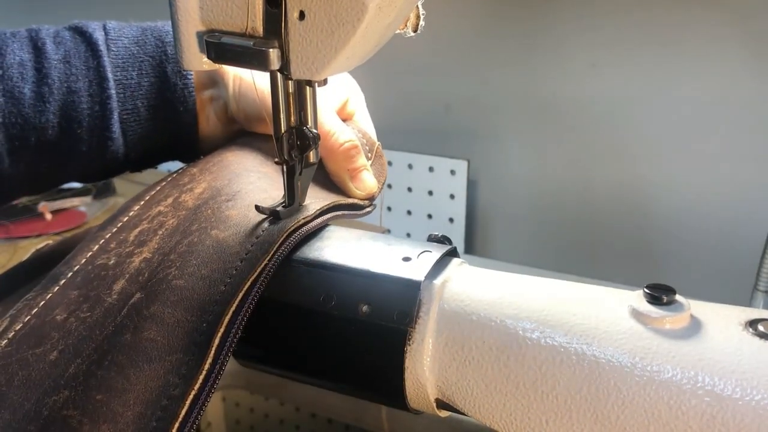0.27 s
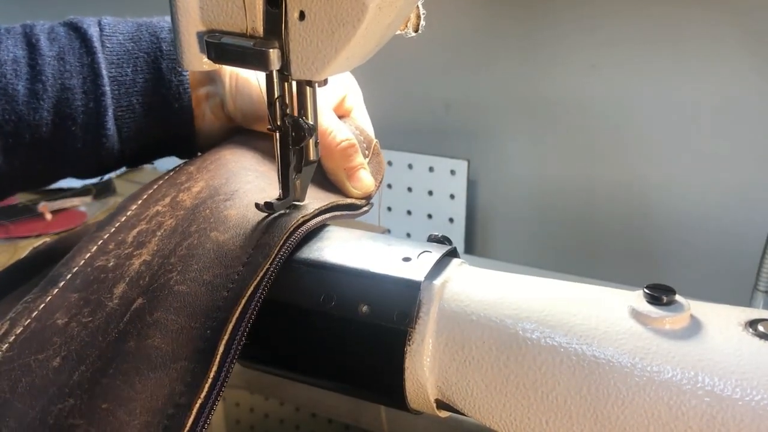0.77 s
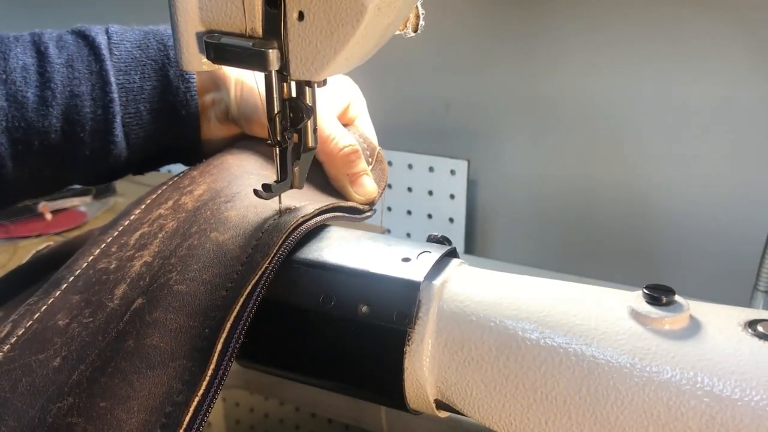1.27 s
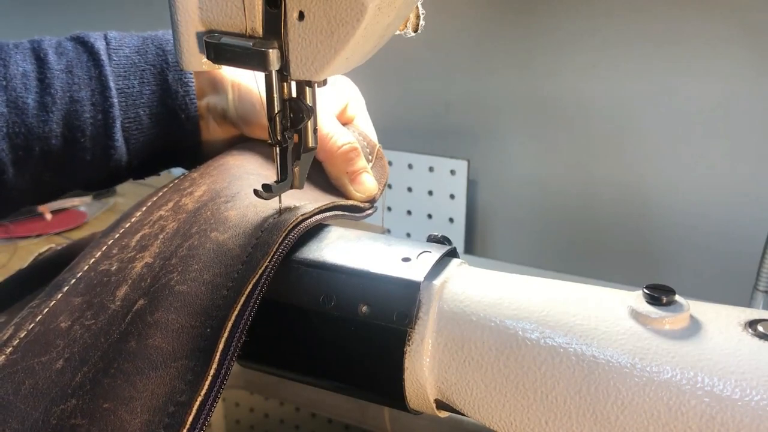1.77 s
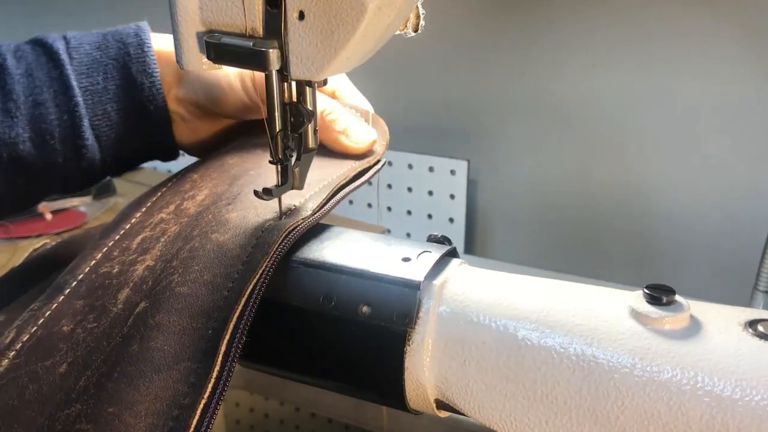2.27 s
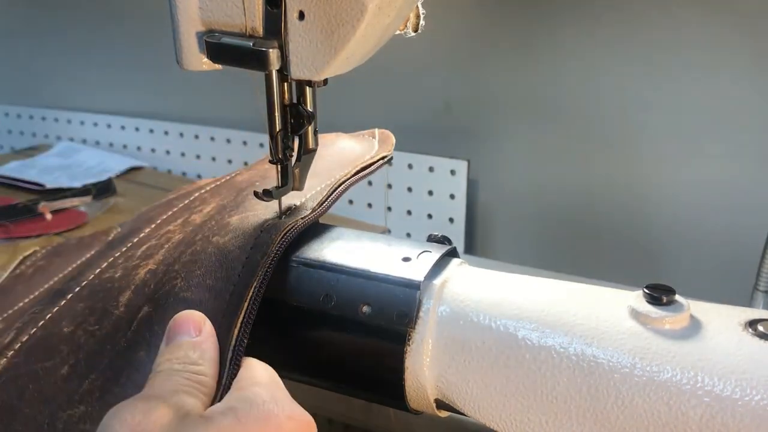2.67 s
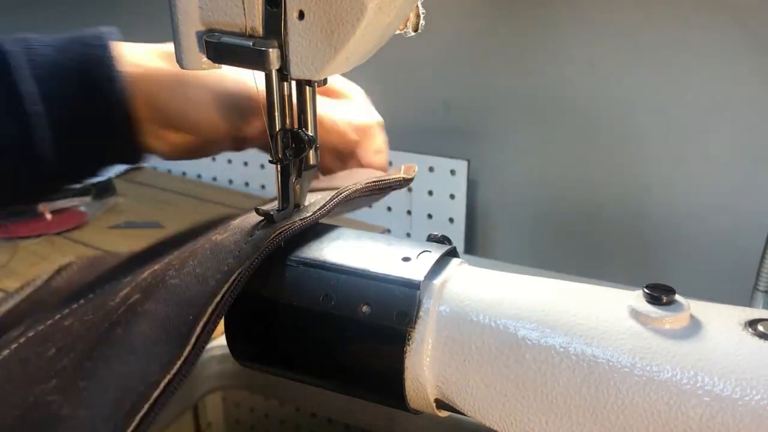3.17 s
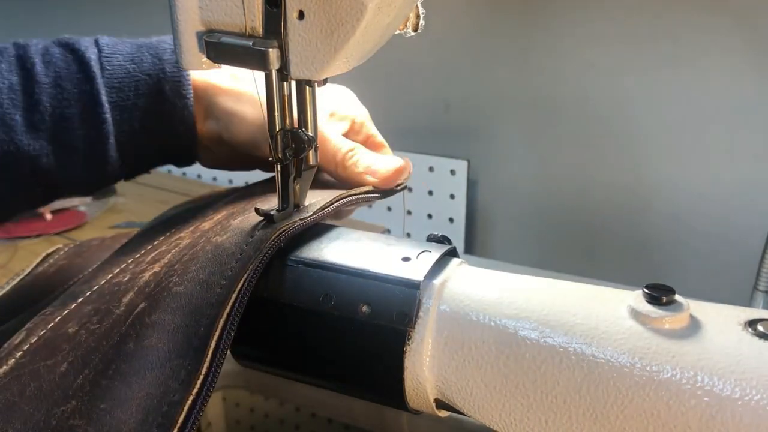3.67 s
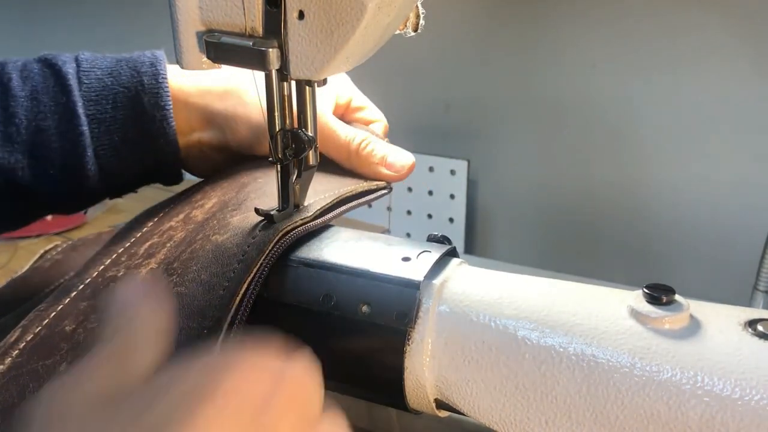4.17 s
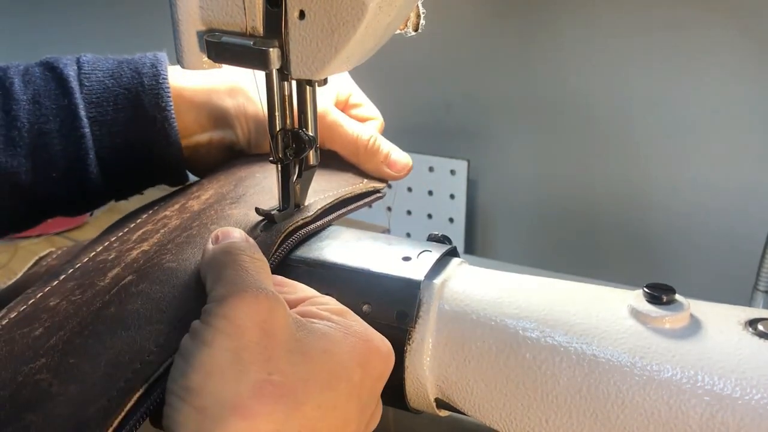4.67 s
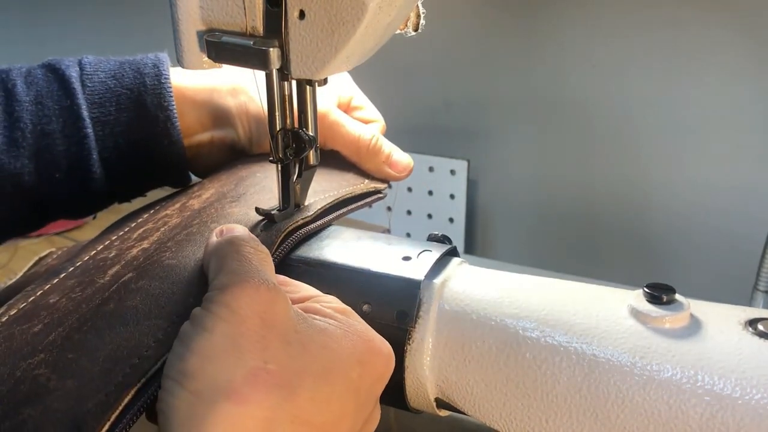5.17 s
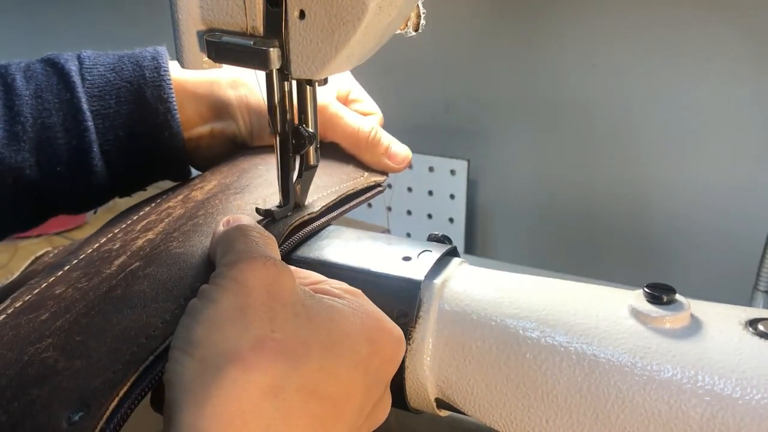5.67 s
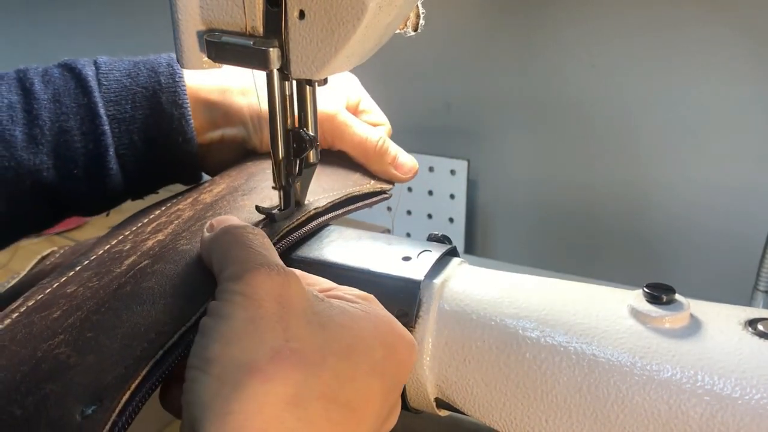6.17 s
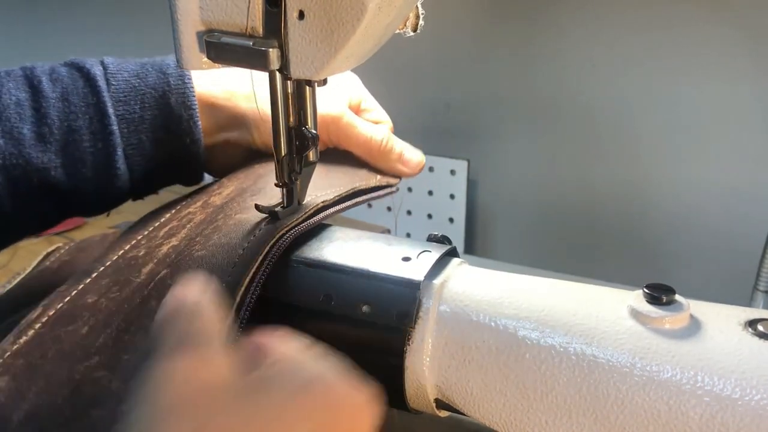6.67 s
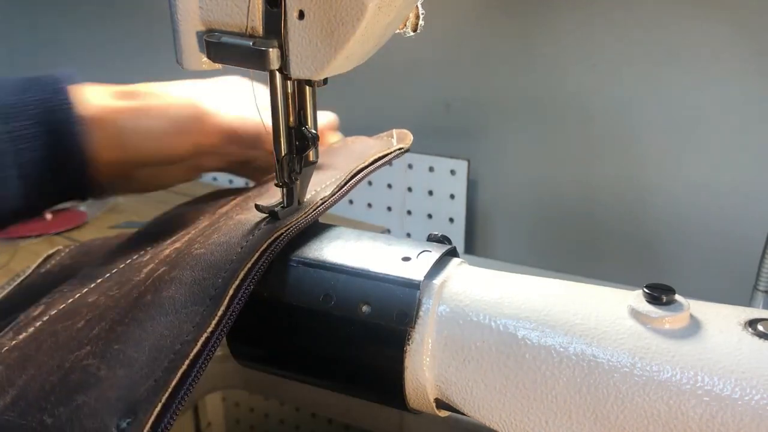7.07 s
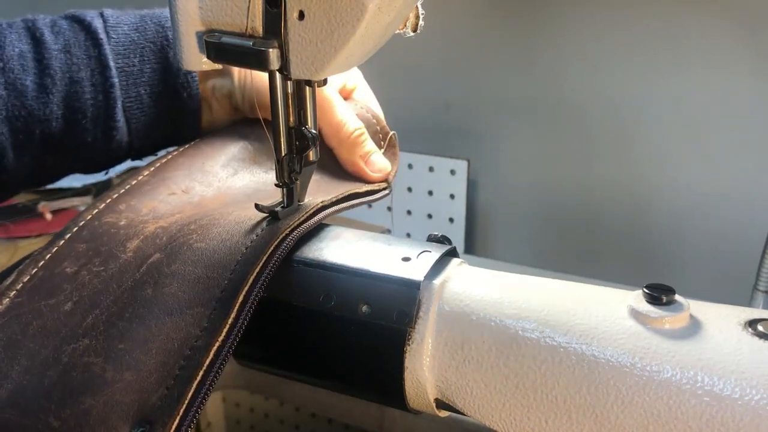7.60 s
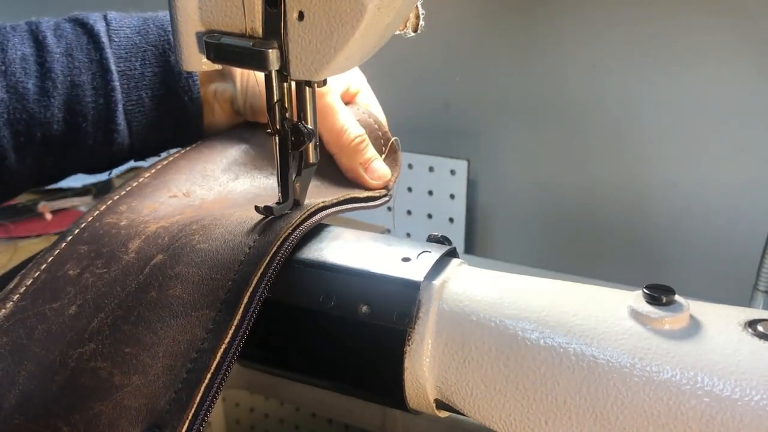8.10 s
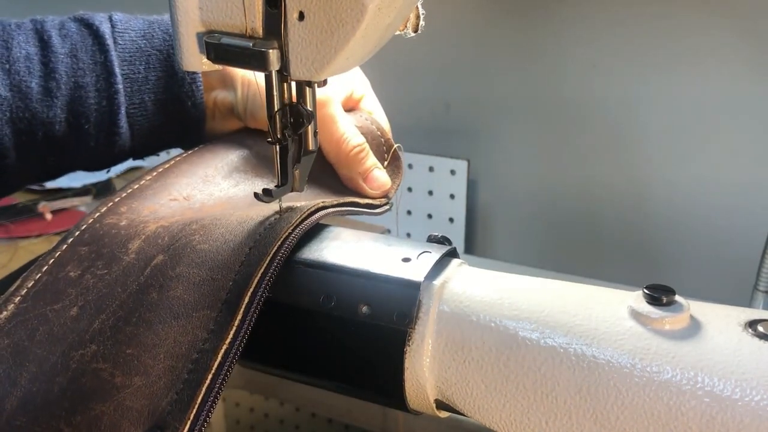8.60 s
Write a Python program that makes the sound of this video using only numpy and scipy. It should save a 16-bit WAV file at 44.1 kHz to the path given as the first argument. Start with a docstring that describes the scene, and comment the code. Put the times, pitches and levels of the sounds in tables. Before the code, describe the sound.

A close microphone in a small workshop catches a heavy sewing machine over its low, slowly wavering motor hum and faint fan rush. From 0 to 0.9 s, a faint ping, crisp metal snaps, leather crackle and a thin, very high squeak. From 1 to 2 s only light ticks, then a firmer click and thump at 2.0. Leather slides and knocks around 2.5-2.8; at 3.0 comes the loudest hard clack with a squeak, rasp and ringing spring. It calms until 4.4, when the linkage slips, squeaks, thumps and twangs. From 5.3 to 6.8 a slow powered run rattles, growls and whines, with four foot blows about 0.4 s apart, ending in clunks. From 7.0 to 7.5 leather scuffs, rasps and a spring ring; from 7.7 to 8.5, clicks, dry rasping and a short falling groan with squeaks at 8.3, then soft rustle, a small click and hum.

```python
"""A cylinder-arm sewing machine is inched through thick leather, close by, over the hum of its idling motor.
Presser foot and feed snap as bursts of force through frame resonances; dry joints rasp, groan and squeak
by stick-slip; a jolted spring rings as decaying sines. One slow run rattles the needle bar and gears.
The leather is turned by hand: filtered noise slides, random ticks creak. A small workshop answers briefly."""
import sys
import numpy as np
from scipy import signal
from scipy.fft import rfft, irfft
from scipy.io import wavfile
from scipy.ndimage import uniform_filter1d

SR = 44100
rng = np.random.default_rng(int(sys.argv[2]) if len(sys.argv) > 2 else 0)


def store_pcm(level_fs):
    """Save levels as 16-bit WAV."""
    pcm = np.round(np.clip(level_fs, -1, 1) * 32767).astype(np.int16)
    wavfile.write(sys.argv[1], SR, np.atleast_2d(pcm).T)


N = 389844
TIME = np.arange(N) / SR
TOP_HZ = 15900  # upper limit of the microphone path


def undb(db):
    """Decibels to gain."""
    return 10 ** (np.asarray(db) / 20)


def unit(x):
    """Scale to an rms of one."""
    return x / np.sqrt(np.mean(x ** 2) + 1e-20)


def gain_curve(rows):
    """Sum, as power, movements that each build up and die away at the same pace."""
    power = 0
    for peak_s, fade_s, db in rows:
        power = power + (undb(db) * np.exp(-np.abs(TIME - peak_s) / fade_s)) ** 2
    return np.sqrt(power)


def walk(rate):
    """Slow random drift with an rms of one, drawn afresh about `rate` times a second."""
    hold = int(SR / rate)
    steps = np.repeat(rng.standard_normal(N // hold + 1), hold)
    return unit(uniform_filter1d(uniform_filter1d(steps, hold), hold)[:N])


def colour(x, points):
    """Shape a sound by a spectrum of (frequency [Hz], level [dB]), interpolated over log frequency."""
    hz, db = np.transpose(points)
    f = np.maximum(np.fft.rfftfreq(len(x), 1 / SR), 1)
    gain = undb(np.interp(np.log(f), np.log(hz), db))
    return irfft(rfft(x) * gain, len(x))


def ring(x, modes):
    """Drive a set of resonances (frequency [Hz], width [Hz], level [dB])."""
    out = 0
    for hz, width, db in modes:
        out = out + undb(db) * signal.lfilter(*signal.iirpeak(hz, hz / width, fs=SR), x)
    return out


def grains(rate, spread_db):
    """Random tiny impacts, `rate` a second, most of them weak and a few strong."""
    hit = rng.random(N) < rate / SR
    size = np.minimum(rng.exponential(size=N), 4)
    return hit * undb(spread_db * size) * rng.choice([-1, 1], N)


def crackle(rate, spread_db, fade_s):
    """Random ticks, each a very short burst of noise."""
    hits = np.abs(grains(rate, spread_db))
    envelope = signal.lfilter([1], [1, -np.exp(-1 / (fade_s * SR))], hits)
    return envelope * rng.standard_normal(N)


def add(out, s, x):
    """Mix a sound in at a time."""
    i = max(int(s * SR), 0)
    out[i:i + len(x)] += x[:N - i]


def contact(force, span_s, db, colour_db, body, body_db, soft_hz=450, place_db=9.5):
    """A contact force heard through a body's modes as thud, knock, middle and edge, levelled over its first span."""
    # each contact lands elsewhere and favours other modes
    modes = [(hz, width, mode_db + place_db * rng.uniform(-1.8, 1)) for hz, width, mode_db in body]
    heard = force + undb(body_db) * ring(force, modes)
    thud_db, knock_db, edge_db = colour_db
    # a softer contact has a weaker edge that also ends lower
    top_hz = np.clip(14500 + soft_hz * edge_db, 9000, 15800)
    bands_hz = [(560, 1080), (1150, 2400), (2400, 6000), (6000, top_hz)]
    out = 0
    for band, band_db in zip(bands_hz, (thud_db, knock_db, 0, edge_db)):
        part = signal.sosfilt(signal.butter(3, band, "band", fs=SR, output="sos"), heard)
        first_rms = np.std(part[:int(span_s * SR)])
        out = out + undb(db + band_db) * part / first_rms
    return out


def room(x, wet_db, low_t60=0.46, high_t60=0.17):
    """A small workshop: a short diffuse tail whose treble dies first."""
    t = TIME[:SR // 2]
    low = colour(rng.standard_normal(len(t)), [(1500, -3.5), (5000, -25.0), (16000, -39.5)])
    high = colour(rng.standard_normal(len(t)), [(1500, 13.5), (5000, 7.0), (16000, 1.0)])
    tail = low * undb(-60 * t / low_t60) + high * undb(-60 * t / high_t60)
    tail = tail * (t > .004)  # the tail comes in 4 ms after the sound
    return undb(wet_db) * signal.fftconvolve(x, tail / np.linalg.norm(tail))[:N]


# steady motor and mains lines, before their waver: (frequency [Hz], rms level [dB])
HUM_LINES = [(59, -78.5), (120, -76.5), (240, -61.5), (270.5, -67.5)]
# spectrum of the fan's rush: (frequency [Hz], relative level [dB])
FAN_COLOUR = [(25, -31.5), (40, -35.5), (58, -7.5), (72, -12), (100, 6), (140, 1), (215, 0), (300, -3.5),
              (700, -6.5), (1000, -21.5), (2000, -27), (5000, -48.5), (10000, -46), (16000, -32)]
# slow beat of the rotor hum: period, time of one crest, depth 0-1
BEAT_S, BEAT_CREST_S, BEAT_DEPTH = 2.4, 4.31, 0.45


def motor(air_db=-58.5, drift_rad=0.51, waver_db=3.5, rotor_hz=118.9, rotor_db=-61.0):
    """The idling motor: a slowly beating rotor hum just under the mains hum, wavering lines and its fan's rush."""
    beat = 1 + BEAT_DEPTH * np.cos(2 * np.pi * (TIME - BEAT_CREST_S) / BEAT_S)
    rotor = undb(rotor_db) * beat * np.sin(2 * np.pi * rotor_hz * TIME + drift_rad * walk(3))
    lines = 0
    for hz, db in HUM_LINES:
        level = undb(db + waver_db * np.tanh(walk(4.4)))
        lines = lines + level * np.sin(2 * np.pi * hz * TIME + drift_rad * walk(2.4))
    air = unit(colour(rng.standard_normal(N), FAN_COLOUR))
    return np.sqrt(2) * (rotor + lines) + undb(air_db + 0.16 * walk(3.6)) * air


# pushes of the hand that slide the leather over the arm: (time of peak [s], fade [s], relative level [dB])
PUSHES = [(0.03, 0.15, -63), (.27, 0.039, -64), (.8, 0.27, -65), (1.45, 0.36, -82), (2.04, 0.095, -66.5),
          (2.345, 0.016, -59), (2.47, 0.039, -58), (2.76, 0.069, -62.5), (3.08, 0.16, -53.5),
          (3.8, 0.24, -70), (4.33, 0.047, -63), (4.66, 0.079, -71), (7.22, 0.18, -57), (7.82, 0.079, -65),
          (8.09, 0.045, -53), (8.35, 0.075, -54.5), (8.84, 0.11, -60.5)]
# the hide is bent and its fibres crackle: (time of peak [s], fade [s], level [dB])
BENDS = [(0.3, 0.043, -63), (0.56, 0.033, -59), (0.8, 0.13, -63.5), (1.1, 0.12, -71.5), (1.33, 0.088, -72),
         (1.6, 0.08, -76), (1.95, 0.1, -68.5), (7.6, 0.2, -73), (7.84, 0.082, -67), (8.15, 0.055, -64)]
# spectrum of the sliding hide: (frequency [Hz], relative level [dB])
SLIDE_COLOUR = [(700, 10), (1500, 5), (3500, 0), (6000, -4), (9000, -6.5), (12000, -10), (16000, -17)]
HOLD_DB = -73  # the hide merely held, on the same scale as the pushes


def leather(slide_db=-1.5, creak_db=-9, creak_s=0.0015, fibre_s=0.0006):
    """The hide slides with a fine, uneven hiss and, when pushed or bent, its fibres give in lone ticks."""
    pushed = gain_curve(PUSHES)
    slide = unit(colour(rng.standard_normal(N), SLIDE_COLOUR)) * undb(2 * walk(60))
    fibre_colour = [(800, -30.5), (3000, 5), (5000, 8.0), (9000, 5), (16000, 1.5)]
    creak = unit(colour(crackle(rate=35, spread_db=6.5, fade_s=creak_s), fibre_colour))
    fibres = unit(colour(crackle(rate=93, spread_db=4.0, fade_s=fibre_s), fibre_colour))
    sliding = (pushed + undb(HOLD_DB)) * undb(slide_db) * slide
    creaking = pushed * undb(creak_db) * creak
    return sliding + creaking + gain_curve(BENDS) * fibres


# hide and thread drawn tight: (time of peak [s], half length [s], centre frequency [Hz], level [dB])
RUSTLES = [(0.25, 0.041, 3460, -61), (0.463, 0.019, 3600, -62), (0.52, 0.032, 3640, -55),
           (1.02, 0.016, 3620, -62), (1.122, 0.023, 5300, -68), (1.212, 0.015, 5400, -73),
           (1.98, 0.063, 5000, -67.5), (2.07, 0.032, 4800, -73), (3.68, 0.038, 9300, -62.5),
           (4.319, 0.0065, 2220, -57), (7.17, 0.03, 3800, -64), (7.793, 0.03, 3800, -58),
           (7.858, 0.0071, 4070, -56), (8.05, 0.036, 3470, -61)]


def rustles(width_share=0.23):
    """Hide and thread rustle in gritty swells of tiny catches, each around its own pitch."""
    catches = grains(rate=660, spread_db=3.5)
    out = np.zeros(N)
    for peak_s, half_s, hz, db in RUSTLES:
        swell = np.exp(-((TIME - peak_s) / half_s) ** 2)
        out += undb(db) * swell * unit(ring(catches, [(hz, width_share * hz, 0)]))
    return out


# the lifter settling and shaking the table: (time [s], peak level [dB])
THUMPS = [(0.731, -43.5), (2.011, -38.5), (3.028, -37), (4.415, -43), (4.442, -40), (4.571, -41),
          (6.837, -38.5), (6.859, -36), (8.489, -43), (8.536, -40.5)]
# resonances of the table: (frequency [Hz], width [Hz], level [dB])
TABLE_MODES = [(184, 40, -10), (237, 40, 2), (334, 45, 4), (437, 70, 1), (558, 45, 6.5)]


def thumps(push_s=0.0081):
    """Soft blows, short fading noise, sound the low modes of the table."""
    out, t = np.zeros(N), TIME[:SR // 4]
    low_pass = signal.butter(2, 700, fs=SR, output="sos")
    for s, db in THUMPS:
        push = rng.standard_normal(len(t)) * np.exp(-t / push_s)
        thump = signal.sosfilt(low_pass, ring(push, TABLE_MODES))
        add(out, s, undb(db) * thump / np.abs(thump).max())
    return out


# jolts that set the presser spring ringing: (time [s], level [dB])
TWANGS = [(3.123, -59), (3.306, -55.5), (4.409, -48.5), (7.232, -48.5), (8.488, -54)]
# modes of the presser spring, before scatter: (frequency [Hz], t60 [s], relative level [dB])
PRESSER_SPRING = [(1071, 0.46, 1), (989, 0.29, -13), (1175, 0.4, -3), (1335, 0.24, -7.5), (1560, 0.22, -5),
                  (2940, 0.26, -9.5)]
# plucks of the thread on the tension spring: (time [s], level [dB])
PINGS = [(0.012, -50), (5.367, -60)]
# modes of the fine thread-tension spring, before scatter: (frequency [Hz], t60 [s], relative level [dB])
TENSION_SPRING = [(4230, 0.094, -5), (8660, 0.18, 1), (15080, 0.15, -13.5)]


def twangs(jolts, modes, scatter_db=2, buzz_rad=0.29):
    """A spring is jolted and its modes ring on as decaying sines, buzzing a little against its seat."""
    out, t = np.zeros(N), TIME[:SR]
    seat = walk(70)
    for s, db in jolts:
        for hz, t60, mode_db in modes:
            phase = 2 * np.pi * hz * t + buzz_rad * np.roll(seat, rng.integers(N))[:SR]
            start_db = db + mode_db + scatter_db * rng.standard_normal()
            add(out, s, undb(start_db - 60 * t / t60) * np.sin(phase))
    return out


# stick-slip tones, high from dry steel, low from the needle in leather:
# (time of peak [s], half length [s], pitch at peak [Hz], peak level before flutter [dB], roughness [rad])
SQUEAKS = [(0.734, 0.0033, 705, -28.5, 0.32), (0.84, 0.0037, 708, -37, 0.4),
           (0.851, 0.0039, 5630, -36.5, 1.3), (0.861, 0.0077, 11090, -22, .15),
           (2.742, 0.0039, 552, -35, 0.13), (2.978, 0.0067, 11880, -28.5, 0.45),
           (2.992, 0.0088, 12160, -41, .4), (4.387, 0.0097, 4530, -38.5, 0.28),
           (4.423, 0.0098, 2520, -38, 0.89), (7.024, 0.0053, 4350, -44, 1.2),
           (7.022, 0.0028, 4850, -48.5, 0.46), (5.788, 0.009, 657, -45.5, 0.98),
           (5.981, 0.0046, 805, -48.5, 0.66), (6.169, .007, 757, -49, 0.69),
           (6.387, 0.0039, 724, -46, 0.55), (6.574, 0.0062, 680, -50, 0.86),
           (7.551, 0.0078, 706, -41.5, .3), (8.267, 0.0028, 710, -38.5, 0.35),
           (8.307, 0.0056, 4700, -35.5, 0.77), (8.303, .008, 14200, -40, .9),
           (8.305, 0.008, 8940, -44, 1.2), (8.49, 0.0072, 5770, -36, 0.22),
           (8.492, 0.011, 12080, -35.5, 0.99)]


def squeaks(overtone_db=-18, sag_hz=15, flutter=0.19):
    """Brief tones that swell, sag and judder as a joint sticks and slips; the lower ones carry an octave."""
    out, judder = np.zeros(N), walk(800)
    for peak_s, half_s, hz, db, rough in SQUEAKS:
        u = np.arange(-3, 3, 1 / (half_s * SR))  # time from the peak, in half lengths
        roughness = rough * judder[int(peak_s * SR):][:len(u)]
        phase = 2 * np.pi * np.cumsum(hz - sag_hz * u) / SR + roughness
        octave = (2 * hz < TOP_HZ) * undb(overtone_db) * np.sin(2 * phase)
        add(out, peak_s - 3 * half_s, undb(db) * np.exp(-u ** 2) * (np.sin(phase) + octave))
    return out * (1 + flutter * walk(760))


# a dry bearing groans as the shaft is eased round: (time [s], pitch [Hz], relative level [dB])
GROAN = [(8.268, 1275, -64), (8.287, 1274, -51), (8.299, 1231, -49), (8.308, 1230, -39), (8.322, 1214, -44),
         (8.334, 1178, -41.5), (8.37, 1175, -59)]
# fundamental and overtones of the groan: relative level [dB]
GROAN_PARTIALS = [0.5, -8.5, -10.5, -13, -24, -26, -17]


def groan(rough_rad=0.24, flutter_db=2):
    """A bearing sticks and slips at an even, falling rate: a short juddering tone rich in overtones."""
    s, hz, db = np.transpose(GROAN)
    phase = 2 * np.pi * np.cumsum(np.interp(TIME, s, hz)) / SR + rough_rad * walk(640)
    tone = 0
    for number, partial_db in enumerate(GROAN_PARTIALS, start=1):
        tone = tone + undb(partial_db) * np.sin(number * phase)
    level = undb(np.interp(TIME, s, db) + flutter_db * walk(300))
    return unit(tone) * level * ((TIME > s[0]) & (TIME < s[-1]))


# strokes of the foot linkage, rasping as it moves: (start [s], length [s], level at the start [dB])
RASPS = [(0.63, 0.032, -52.5), (0.683, 0.22, -52.5), (0.975, 0.073, -61.5), (2.975, 0.039, -45.5),
         (3.066, 0.34, -57), (3.111, 0.038, -43), (4.363, 0.02, -49), (4.553, 0.13, -59),
         (7.087, 0.11, -62), (7.217, 0.039, -42.5), (7.425, 0.09, -48.5), (8.094, 0.13, -46.5),
         (8.27, 0.12, -46), (8.411, 0.033, -41.5), (8.473, 0.068, -43)]
# spectrum of the rasp: (frequency [Hz], relative level [dB])
RASP_COLOUR = [(600, -21), (1200, -1.5), (1480, -0.5), (2000, -4.5), (5000, -13.5)]
# resonances of the foot linkage: (frequency [Hz], width [Hz], relative level [dB])
LINKAGE_MODES = [(1275, 53, 1.5), (1384, 70, 3.5), (1553, 55, 0.5), (1960, 160, -9), (2470, 20, -9),
                 (2950, 32, -7), (3280, 90, -5.5), (3670, 200, -5), (5170, 96, -13), (5980, 83, -9.5)]
RASP_FADE_DB = 9.5  # a stroke eases by this much from start to end


def rasps(soften_s=0.015, place_db=3, shift=0.027):
    """A dry pivot catches over and over, less as the stroke ends; each stroke rings the linkage a little differently."""
    out, count = np.zeros(N), SR // 2
    catches = grains(rate=730, spread_db=1.5)
    t = TIME[:count] - soften_s
    for s, length_s, db in RASPS:
        stretch = 1 + shift * rng.uniform(-0.85, 1)
        modes = [(hz * stretch, width, mode_db + place_db * rng.standard_normal())
                 for hz, width, mode_db in LINKAGE_MODES]
        force = np.roll(catches, -int(s * SR))[:count]
        rasp = unit(colour(ring(force, modes), RASP_COLOUR))
        easing_db = RASP_FADE_DB * np.clip(t / length_s, 0, 1)
        effort = undb(db - easing_db) * ((t > 0) & (t < length_s))
        add(out, s - soften_s, rasp * uniform_filter1d(effort, int(soften_s * SR)))
    return out


# parts and leather slipping under load:
# (time of peak [s], rise [s], fall [s], level of the middle band [dB], bright edge re level [dB])
SLIPS = [(0.548, 0.02, 0.015, -53.5, -3), (0.752, 0.041, 0.0094, -59, -1), (0.85, 0.0078, 0.015, -55, 8),
         (2.019, 0.0034, 0.013, -75, 1), (2.168, 0.0039, 0.018, -66.5, -2.5),
         (2.872, 0.0077, 0.0052, -63.5, -1), (3.119, 0.0049, 0.0097, -43, -5),
         (3.195, 0.0041, 0.012, -56.5, -8), (3.257, 0.0021, 0.015, -49.5, -8),
         (3.306, 0.0024, 0.018, -48.5, -7), (3.346, 0.0028, 0.0096, -54, -8),
         (4.288, 0.0016, 0.0048, -59.5, -3), (4.406, 0.0015, 0.023, -38, -6),
         (4.447, 0.0042, 0.0087, -51.5, 2.5), (4.566, 0.002, 0.011, -55, 1),
         (6.826, 0.0021, 0.012, -44, -1), (6.842, 0.0033, 0.013, -46.5, -6),
         (7.024, 0.0014, 0.026, -59, -19), (6.953, 0.00213, 0.0014, -68, -15),
         (7.099, 0.0023, 0.0076, -44, -23), (7.232, 0.0077, 0.0068, -46, -5.5),
         (7.363, 0.0023, 0.017, -52.5, -25), (7.436, 0.0032, 0.0092, -50.5, -6),
         (7.491, 0.0032, 0.013, -49.5, -6.5), (7.794, 0.0035, 0.017, -56.5, -11),
         (8.299, 0.017, 0.022, -53.5, 8.5), (8.409, 0.0014, 0.0072, -56, 0),
         (8.426, 0.0033, 0.012, -49, -1.5), (8.473, 0.0045, 0.006, -46, -4),
         (8.489, 0.0045, 0.024, -49, -4)]
SLIP_THUD_DB, SLIP_KNOCK_DB = -10.5, 1  # re a slip's level; the knock is that of a slip of the usual length
USUAL_SLIP_S, KNOCK_DB_PER_DOUBLING = 0.015, -3.5  # the longer a slip lasts, the less it knocks


def slips(grain_db=3):
    """Each slip is a dense train of catches in the linkage that swells and dies away."""
    out, t = np.zeros(N), TIME[:SR // 4]
    catches = grains(rate=2800, spread_db=grain_db)
    for s, rise_s, fall_s, db, edge_db in SLIPS:
        from_peak = t - rise_s
        swell = np.where(t < rise_s, np.exp(from_peak / rise_s), np.exp(-np.abs(from_peak) / fall_s))
        force = swell * np.roll(catches, -int(s * SR))[:len(t)]
        length_s = rise_s + fall_s
        knock_db = SLIP_KNOCK_DB + KNOCK_DB_PER_DOUBLING * np.log2(length_s / USUAL_SLIP_S)
        colour_db = SLIP_THUD_DB, knock_db, edge_db
        add(out, s - rise_s, contact(force, length_s, db, colour_db, LINKAGE_MODES, body_db=9))
    return out


# knocks of needle, hook and take-up during the run: (time [s], relative level [dB], relative low body [dB])
TICKS = [(5.3915, -34.5, -9), (5.425, -42, -7), (5.4575, -34.5, -10), (5.4816, -45, -10), (5.498, -41, -21),
         (5.5308, -41.5, -17), (5.7214, -51, -3), (5.745, -58, -12), (5.7763, -44, -5), (5.8374, -40, -12),
         (5.877, -40, -17), (5.906, -44, -11), (5.9358, -45.5, -4), (6.0127, -44, -11), (6.0428, -44, -9),
         (6.1442, -46, -18), (6.1727, -35.5, -8.5), (6.21, -37, -14), (6.2364, -48, -12),
         (6.2598, -36, -12), (6.297, -46, -16.5), (6.318, -46, -20), (6.3815, -54, -6), (6.4312, -47, -11),
         (6.556, -59, -16), (6.574, -43, -19), (6.5904, -41.5, -6), (6.6334, -39.5, -14), (6.6733, -47, -6),
         (6.7056, -43, -7)]
# resonances of the needle bar: (frequency [Hz], width [Hz], relative level [dB])
NEEDLE_BAR_MODES = [(1260, 150, 9), (2340, 140, -19), (3000, 200, 2), (3450, 97, 14.5), (3920, 240, 4),
                    (4620, 105, 11.5), (5100, 190, -17), (5850, 360, -18), (7440, 200, -1), (8030, 200, 5),
                    (8500, 130, 3), (8550, 110, 3)]


def ticks(level_db=-13.5, rise_s=0.0016, fall_s=0.0043, thud_db=1, knock_db=5, edge_db=-6, bar_db=11):
    """Needle, hook and take-up knock through the run and ring the needle bar."""
    out, t = np.zeros(N), TIME[:SR // 10]
    for s, db, low_db in TICKS:
        force = rng.standard_normal(len(t)) * (1 - np.exp(-t / rise_s)) * np.exp(-t / fall_s)
        colour_db = low_db + thud_db, low_db + knock_db, edge_db
        add(out, s, contact(force, 2 * fall_s, db + level_db, colour_db, NEEDLE_BAR_MODES, bar_db))
    return out


# resonances of the gear casting: (frequency [Hz], width [Hz], relative level [dB])
GEAR_MODES = [(255, 24, -4), (338, 46, -5.5), (396, 50, -3), (567, 34, -2.5), (726, 44, 4.5),
              (1030, 100, -11), (1270, 310, -19)]
RUN_START_S, RUN_STOP_S, RUN_DB = 5.345, 6.79, -56  # RUN_DB scales all the layers of the run
SPIN_UP_S, SPIN_UP_DB, CLUTCH_S = 0.081, 22, 0.17  # starts this much softer; the clutch grips and lets go in CLUTCH_S
START_SLOWER, GATHER_S = 0.2, 0.19  # starts this share under full speed and gathers pace in GATHER_S
WHINE_HZ, WHINE_DB = 389, -10  # gear whine at full speed, dB re the run


def running(tooth_hz=40, unevenness=0.15, tick_share=0.28, direct_db=-11, rattle_db=-3.5, growl_db=-3.0,
            whirr=0.47, whine_waver=0.0196, strain_s=0.037, strain_db=-4, shift_db=5.5,
            clatter_db=-6, clatter_s=0.0033, knock_db=-6, knock_s=0.0053):
    """Gear teeth take up their play one by one and ring the needle bar, whose modes come and go as it travels;
    loose links clatter and knock, the gears whine up to speed and the casting growls, most as the needle enters."""
    clutch = uniform_filter1d(1. * ((TIME > RUN_START_S) & (TIME < RUN_STOP_S)), int(CLUTCH_S * SR))
    since_s = np.abs(TIME - RUN_START_S)
    power = clutch * undb(RUN_DB - SPIN_UP_DB * np.exp(-since_s / SPIN_UP_S))
    speed = 1 - START_SLOWER * np.exp(-since_s / GATHER_S)
    strain = 1 + gain_curve([(needle_s, strain_s, strain_db) for _, needle_s, *_ in RUN_BLOWS])

    # each tooth presses hard, then lets go over a share of its turn
    teeth = np.cumsum(tooth_hz * speed * (1 + unevenness * walk(12))) / SR
    pressure = np.exp(-(teeth % 1) / tick_share) * undb(2.2 * walk(40)) + whirr
    force = pressure * grains(rate=3300, spread_db=2.5)
    bar = 0
    for mode in NEEDLE_BAR_MODES:
        bar = bar + ring(force, [mode]) * undb(shift_db * np.tanh(walk(36)))
    direct = colour(force, [(600, 6.0), (1200, 9.0), (5000, 4), (9000, -18), (16000, -1)])
    rattle = unit(bar + undb(direct_db) * direct)

    clatter_colour = [(400, -6), (1200, -3), (2000, -3), (4500, 0.5), (6500, -3), (8500, 1),
                      (10000, -14), (16000, -3.5)]
    clatter = unit(colour(crackle(rate=88, spread_db=4.5, fade_s=clatter_s), clatter_colour))
    knocks = ring(crackle(rate=59, spread_db=2.5, fade_s=knock_s), GEAR_MODES + LINKAGE_MODES)
    knocks = unit(colour(knocks, [(250, -5), (500, -3), (800, 7), (1400, -9), (2400, 3.5), (4000, -8)]))
    growl = ring(pressure * grains(rate=390, spread_db=1.5), GEAR_MODES)
    growl = unit(colour(growl, [(150, -18.0), (300, 9.5), (1400, -3.0), (3000, -24.0)]))
    whine_hz = WHINE_HZ * speed * (1 + whine_waver * walk(19))
    whine = unit(np.sin(2 * np.pi * np.cumsum(whine_hz) / SR) * undb(1.7 * walk(14)))

    loose = undb(rattle_db + 2.2 * walk(25)) * rattle + undb(clatter_db) * clatter + undb(knock_db) * knocks
    growling = undb(growl_db + 2 * walk(10)) * strain * growl
    return power * (loose + growling + undb(WHINE_DB) * whine)


# resonances of the frame: (frequency [Hz], width [Hz], relative level [dB])
FRAME_MODES = [(491.4, 53, -9.5), (740, 150, 9.5), (870, 55, -2.5), (1012, 53, -4), (1339, 140, 4),
               (1780, 110, 2), (2285, 35, 4), (2660, 37, -2.5), (2855, 70, -6.5), (3180, 39, 3.5),
               (3576, 130, 7.5), (4220, 190, 8), (4960, 100, 4), (5610, 110, 3), (7150, 85, -1.5),
               (7800, 380, 1.5)]
SNAP_KNOCK_DB = -7  # knock of any snap, re its level


def snap(db, thud_db, edge_db, crack_s, clatter_s=0.014, clatter_db=-14, tick_db=-4):
    """Steel meets steel: a needle-sharp tick, a hard crack, then a short clatter of loose parts."""
    t = TIME[:SR // 8]
    envelope = np.exp(-t / crack_s) + undb(clatter_db) * np.exp(-t / clatter_s)
    force = rng.standard_normal(len(t)) * envelope
    force[0] += undb(tick_db) * np.linalg.norm(force)
    return contact(force, 0.0084, db, (thud_db, SNAP_KNOCK_DB, edge_db), FRAME_MODES, body_db=3.0)


# blows of the powered run:
# (foot lands [s], needle enters [s], feed strikes [s], relative level [dB], feed re foot [dB])
RUN_BLOWS = [(5.337, 5.392, 5.57, -42, -0.5), (5.697, 5.79, 6.8, -42.5, -10),
             (6.085, 6.183, 6.363, -42.5, -3), (6.489, 6.597, 6.728, -43, -16)]
# re the level of each blow
FOOT_THUD_DB, FOOT_EDGE_DB, FEED_THUD_DB, FEED_EDGE_DB = -19, -1.5, -15, -2


def run_blows(blows_db=1, crack_s=.0017):
    """Snaps of the run: feet land with a sharp crack, and feed strikes follow, one of them at the end of the run."""
    out = np.zeros(N)
    for foot_s, _, feed_s, db, feed_db in RUN_BLOWS:
        add(out, foot_s, snap(db, FOOT_THUD_DB, FOOT_EDGE_DB, crack_s, clatter_db=-10))
        add(out, feed_s, snap(db + feed_db, FEED_THUD_DB, FEED_EDGE_DB, crack_s, clatter_db=-12))
    return undb(blows_db) * out


# single snaps of foot, feed and clutch:
# (time [s], level of the middle band [dB], thud re level [dB], bright edge re level [dB])
SNAPS = [(0.293, -44, -7, -3), (0.325, -52, -1, -10), (0.332, -62, -10, -8), (0.492, -44, -4, 1.5),
         (0.544, -48.5, 0.5, 3.5), (0.592, -55.5, 0, -6), (0.61, -57.5, -10.5, 1), (0.721, -49, -3.5, -2.5),
         (0.75, -52.5, -5.5, -5.5), (0.768, -57.5, -8.5, 2.5), (0.83, -58.5, -12.5, -11),
         (1.059, -54.5, -25, -1), (1.178, -59, -19, 4), (1.361, -70.5, -10, 0), (1.443, -60, -8, -8.5),
         (1.546, -59.5, -1, -9), (1.639, -68.5, -12, -5), (1.884, -67, -16, 1), (1.938, -57, -16, 5),
         (2.008, -42.5, -3.5, 2.5), (2.047, -72, -10, -3), (2.52, -40, -3.5, -3), (2.69, -57.5, -7, -8),
         (2.703, -51.5, -16, -12), (2.738, -45, -2.5, -7.5), (2.787, -60.5, -1, -4), (2.812, -59, 2.5, -7),
         (3.027, -27, -5.5, -0.5), (5.35, -45.5, -7, -20), (5.65, -49, -13, -4), (5.797, -51, 0, -14),
         (7.696, -56, -10, -3), (7.773, -46, -2.5, -2.5), (7.863, -61.5, 2, -2), (7.992, -58.5, 3.5, -1),
         (8.011, -53, -12, -6), (8.034, -59, -3, 4), (8.079, -41, -11.5, -0.5), (8.267, -49.5, -19, -6.5),
         (8.791, -53.5, -20, 1.5)]


def snaps(usual_crack_s=.003, crack_halves_db=45):
    """Single snaps of foot, feed and clutch, a few of them during the run; the harder the blow, the shorter its crack."""
    out, usual_db = np.zeros(N), np.median(np.array(SNAPS)[:, 1])
    for s, db, thud_db, edge_db in SNAPS:
        crack_s = usual_crack_s * 2 ** ((usual_db - db) / crack_halves_db)
        add(out, s, snap(db, thud_db, edge_db, crack_s))
    return out


def scene():
    """The machine and the leather in the room, over the motor."""
    hide = leather() + rustles()
    springs = twangs(TWANGS, PRESSER_SPRING) + twangs(PINGS, TENSION_SPRING)
    joints = squeaks() + groan() + rasps() + slips()
    machine = thumps() + springs + joints + ticks() + running() + run_blows() + snaps()
    work = hide + machine
    return (work + room(work, wet_db=-15.0) + motor())[None]


def record(dry):
    """The microphone path cuts the top with a steep low-pass."""
    return signal.sosfilt(signal.ellip(10, .2, 70, TOP_HZ, fs=SR, output="sos"), dry)


dry = scene()
out = record(dry)
store_pcm(out)
```